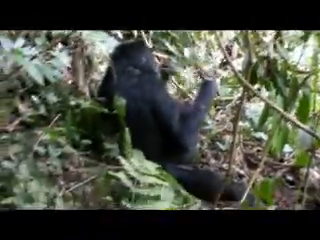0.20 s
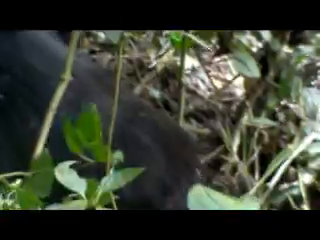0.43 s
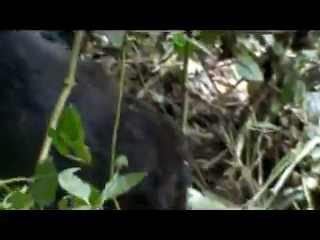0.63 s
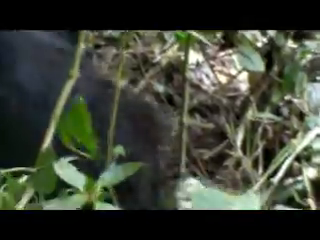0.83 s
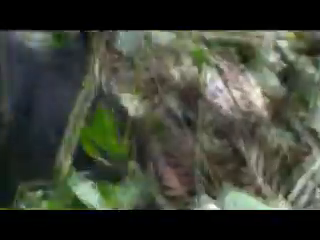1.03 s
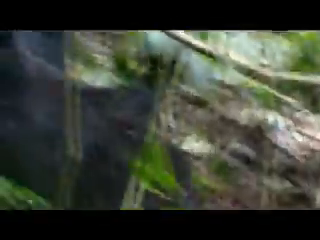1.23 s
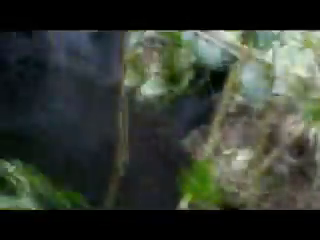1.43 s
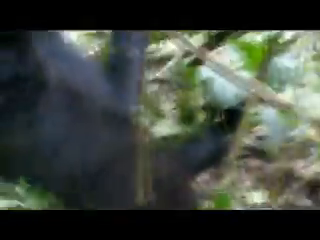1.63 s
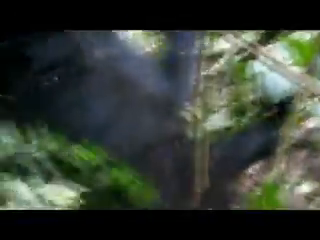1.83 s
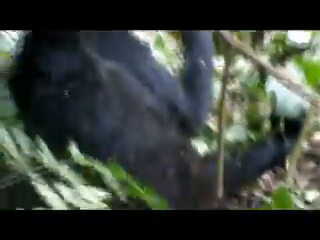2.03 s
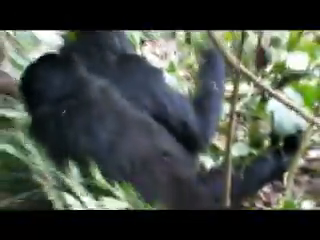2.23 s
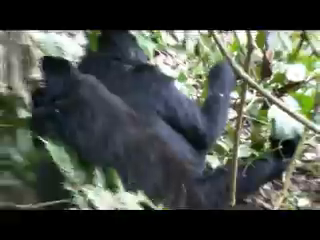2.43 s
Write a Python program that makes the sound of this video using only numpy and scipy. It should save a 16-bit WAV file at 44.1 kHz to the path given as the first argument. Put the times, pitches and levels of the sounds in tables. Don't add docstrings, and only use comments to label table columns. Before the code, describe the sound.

Dry twigs snap sharply and leaves rustle as heavy animals push through close forest undergrowth

```python
import sys
import numpy as np
from scipy import signal
from scipy.io import wavfile
from scipy.ndimage import uniform_filter1d

SR = 44100
rng = np.random.default_rng(int(sys.argv[2]) if len(sys.argv) > 2 else 0)


def store_wav(level_fs):
    pcm = np.round(np.clip(np.atleast_2d(level_fs), -1, 1) * 32767)
    wavfile.write(sys.argv[1], SR, pcm.T.astype(np.int16))


def volts_from_decibels(level):
    exponent = np.asarray(level, float) / 20
    return 10 ** exponent


N = 114660

# pitch_hz, level_db
HUSH_COLOUR = [(25, -40), (60, -7.5), (170, -3), (270, -16), (360, 0.5), (700, -6.5), (2600, -12.5),
               (7000, 2), (14000, -16.5)]
HUSH_DB, HUSH_FADE_DB_PER_S, HUSH_PATCHY_DB = -57, 2, 1.2
WATER_HZ, WATER_WIDTH_HZ, WATER_DB = 385, 41, -80

# pitch_hz, level_db
SINGERS = [(5025, -5.5), (5250, -1), (5325, -2), (5570, -1.5)]
# pitch_hz, level_db
EARLY_SINGERS = [(5075, -3), (5200, -9), (5360, -0.5), (5580, -7)]
THROB_HZ, WAVER_HZ, INSECT_DB = 37.97, 20.56, -56.5
FAR_INSECT_HZ, FAR_INSECT_WIDTH_HZ, FAR_INSECT_DB = 6700, 600, -65.0

# start_s, peak_db, pitch_hz
THUMPS = [(.212, -61, 50), (.413, -57, 62), (.418, -60, 160), (0.477, -53, 75), (.52, -60, 80),
          (.652, -52.5, 88), (.69, -56, 100), (.722, -60, 50), (1.051, -62, 70), (1.116, -58, 95),
          (1.472, -56, 51), (1.575, -59, 59.2), (1.6, -61, 60), (1.876, -63, 55)]
THUMP_T60_S = 0.048

# start_s, peak_db, pitch_hz, t60_s
KNOCKS = [(0.144, -50.5, 1530, 0.02), (0.2069, -49, 1325, 0.015), (0.4205, -42, 734, 0.036),
          (0.4706, -33, 2340, 0.031), (.485, -34.5, 2300, 0.018), (0.5126, -38.5, 2280, 0.035),
          (.533, -40.5, 2260, 0.043), (0.647, -41, 3500, 0.004), (.649, -40, 1300, .006),
          (.66, -41, 2720, .008), (0.6713, -40.5, 1440, 0.016), (.689, -39, 2110, .02),
          (.709, -48, 3600, .025), (.917, -50.5, 1170, 0.021), (1.0674, -39.5, 3420, 0.0077),
          (1.1265, -36, 1950, 0.005), (1.1265, -52, 790, 0.0038), (1.192, -48, 1162, 0.059),
          (1.2277, -43, 2040, 0.0054), (1.236, -47, 2970, .008), (1.259, -42, 3060, 0.0047),
          (1.311, -49, 1760, 0.013), (1.579, -48, 1430, 0.0057), (1.843, -51, 2200, 0.013),
          (1.8822, -40, 2300, .005), (1.8828, -35, 3860, 0.01)]
# pitch_ratio, level_db
OVERTONES = [(1.071, -4), (1.55, -4), (2.5, -2)]
CONTACT_S = 0.0048
LOW_KNOCK_PURER_DB = 17

# start_s, peak_db, dull_part_db (against the bright part), tail_t60_s, strongest_hz
SNAPS = [(.2072, -17, -13, .015, 10800), (.2155, -30, -22, .08, 13200), (.2218, -18, -18, .018, 8800),
         (.2274, -11, -14, 0.032, 11400), (0.2327, -15, -12, 0.027, 10100), (0.236, -32, -25, 0.034, 9500),
         (0.454, -28, -3.5, 0.077, 7000), (0.4704, -25, -0.5, .05, 5700), (.4855, -32, -10, 0.035, 5800),
         (0.491, -25, -14, .03, 8600), (0.5125, -26, -1, .07, 6300), (0.521, -27, -15, 0.043, 6500),
         (0.5346, -21.5, -12, 0.04, 9800), (0.541, -28, -12, .04, 8600), (.6475, -41, -3, .02, 6000),
         (.702, -42, -7, .015, 8000), (.7118, -36, -4, .02, 8000), (0.758, -30, -13, 0.076, 8000),
         (.8675, -24.5, -8, 0.01, 7940), (.9543, -30.5, 1, 0.032, 8450), (1.068, -29, -11, .046, 8560),
         (1.1265, -30, -14, 0.032, 9000), (1.2102, -18, -18, 0.022, 10800), (1.2477, -22, -20, .015, 11800),
         (1.2485, -28, -20, .015, 8000), (1.873, -38, -5, 0.013, 8000), (1.8814, -21, -6, 0.035, 7760),
         (1.8854, -21.5, -9, 0.097, 9250), (1.939, -27, -14, 0.033, 9500), (1.9498, -26, -22, 0.068, 9350),
         (1.9772, -27, -22, .04, 8600), (2.1217, -32, -7, 0.036, 8600), (2.134, -29, -8, .015, 9000),
         (2.143, -31, -11, 0.013, 9000), (2.158, -35, -4, .02, 8000), (2.262, -30, -6, 0.019, 9000),
         (2.287, -32, -12, .015, 9000), (2.41, -27, -17, 0.018, 10500)]
CRACK_HZ = [5420, 7140, 8600, 10190, 12500]
CRACK_T60_S, DULL_HZ, DULL_T60_S = 0.0031, 3777, 0.0046
CRACK_FALL_DB_PER_OCTAVE = 13
TEAR_S = .0007
TAIL_DB, SPLINTER_SPREAD_DB, SNAP_LOW_CUT_HZ = -11, 3.5, 1370

# start_s, vigour_db, coarse_share_db
EARLY_BRUSH = [
    (0, -58.5, 0),
    (.15, -54, -5),
    (.25, -41, -10),
    (.38, -48, -3.5),
]
# start_s, vigour_db, coarse_share_db (big leaves and stems)
BRUSH = [(.42, -47.5, -4), (.5, -40.5, -10.5), (.55, -44, -15), (.59, -51, 0.5), (.84, -51, -2.5),
         (1.0, -51.5, -2), (1.17, -51.5, -1), (1.3, -53, -5.5), (1.6, -52.5, -3), (1.83, -57, -5.5),
         (2.05, -52, -6.5), (2.13, -44, -9.5), (2.35, -49.5, -8.5), (2.6, -52, -4.5)]
# peak_s, vigour_db, coarse_share_db, length_s
SWEEPS = [
    (0.691, -46.5, 4, 0.08),
    (0.763, -49.5, -2.5, 0.077),
    (0.964, -50.5, -2, 0.087),
    (1.056, -43.5, -8.5, 0.067),
    (1.253, -50, 0, 0.12),
    (1.424, -59, 3, .02),
    (1.764, -50.5, -1, 0.046),
    (1.846, -51, -3, 0.06),
    (1.892, -45, -6.5, 0.092),
    (1.956, -43.5, -8, 0.11),
]
SWEEP_RISE = 0.62
# pitch_hz, level_db (per Hz)
FINE = [(2500, -26), (4000, -4), (6500, -1), (8500, -0.5), (10300, 1.5), (11500, 4.5), (12600, -7),
        (14000, 12.5)]
# pitch_hz, level_db (per Hz)
COARSE = [(250, -52), (400, -10.5), (700, -6), (1400, -4.5), (2300, 3.5), (3500, 4), (5000, -4),
          (7000, -4.5)]
GRAINS_PER_S, GRAIN_SPREAD_DB, LARGEST_GRAIN = 4000.0, 2, 4
GRAIN_CYCLES, CLUMP_DB = 6.8, 3.0
HISS_SHARE_DB, LEAF_PATCHY_DB, LEAF_LOW_CUT_HZ = 3, .8, 300

# time_s, gain_db
SCENE_CHANGE = [
    (0.376, 2),
    (.381, -15),
    (.398, -28.5),
    (.404, -15),
    (0.42, 0),
    (0.422, 2),
]
# pitch_hz, width_hz, depth (0 to 1)
MIC_DIPS = [(4780, 310, 0.19), (6100, 280, 0.35), (11060, 540, 0.3)]
# pitch_hz, width_hz, share_of_time (0 to 1)
DROPOUTS = [(2050, 160, .12), (2300, 160, .14), (2500, 170, .16), (2750, 170, .18), (2950, 170, .16),
            (3150, 180, .18), (3400, 180, .12), (3650, 180, .16), (3900, 200, .18), (4100, 200, .22),
            (4300, 220, .28), (4500, 220, .28), (4680, 200, .3), (4830, 200, .4), (6150, 200, .15)]
DROPOUT_RATE_HZ, TOP_HZ = 24, 13520


def rms_one(x):
    return x / np.sqrt(np.mean(x ** 2) + 1e-20)


def low_cut(x, hz):
    return signal.sosfilt(signal.butter(3, hz, "high", fs=SR, output="sos"), x)


def drift(rate):
    r = np.exp(-2 * np.pi * rate / SR)
    wander = signal.lfilter([1], [1, -2 * r, r * r], rng.standard_normal(N + SR))
    return rms_one(wander[SR:])


def ring(clicks, hz, t60):
    r = volts_from_decibels(-60 / (t60 * SR))
    w = 2 * np.pi * hz / SR
    return signal.lfilter([0, np.sin(w)], [1, -2 * r * np.cos(w), r * r], clicks + 1e-18)


def band_t60(width_hz):
    return np.log(1000) / np.pi / width_hz


def at_hz(points, hz):
    f, db = np.transpose(points)
    return np.interp(np.log(hz), np.log(f), db)


def hiss(spectrum, patchy_db):
    edges = 22 * 2 ** np.arange(0, 9.5, 1 / 3)
    out = 0
    together = drift(14)
    white = rng.standard_normal((2, N))
    for k, (low, high) in enumerate(zip(edges, edges[1:])):
        band_filter = signal.butter(2, [low, high], "band", fs=SR, output="sos")
        band = signal.sosfilt(band_filter, white[k % 2])
        flicker = together * min(low / 1500, 1) + 0.74 * drift(4.2)
        out = out + band * volts_from_decibels(at_hz(spectrum, np.sqrt(low * high)) + patchy_db * flicker)
    return rms_one(out)


def grains(spectrum, rate):
    size_db = GRAIN_SPREAD_DB * np.minimum(rng.exponential(1, N), LARGEST_GRAIN)
    sizes = volts_from_decibels(size_db) * rng.choice([-1, 1], N)
    born = rng.random(N) < rate * volts_from_decibels(CLUMP_DB * drift(25)) / SR
    pitches = np.geomspace(spectrum[0][0], spectrum[-1][0], 20)
    dealt = rng.integers(0, 20, N)
    out = 0
    for k, hz in enumerate(pitches):
        clicks = sizes * born * (dealt == k)
        out = out + volts_from_decibels(at_hz(spectrum, hz)) * hz * ring(clicks, hz, GRAIN_CYCLES / hz)
    return rms_one(out)


def add(out, s, sound):
    i = int(s * SR)
    out[i:i + len(sound)] += sound[:len(out) - i]


def distant_water():
    drone = ring(rng.standard_normal(N), WATER_HZ, band_t60(WATER_WIDTH_HZ))
    return volts_from_decibels(WATER_DB) * rms_one(low_cut(drone, 280))


def forest_hush():
    from_middle_s = (np.arange(N) - N / 2) / SR
    return volts_from_decibels(HUSH_DB - HUSH_FADE_DB_PER_S * from_middle_s) * hiss(HUSH_COLOUR, HUSH_PATCHY_DB)


def insects():
    turn, near = 2 * np.pi / SR, 0
    beat = turn * np.cumsum(THROB_HZ + 9.49 * drift(6.45))
    early = np.arange(N) < SCENE_CHANGE[2][0] * SR
    for (hz_after, db_after), (hz_before, db_before) in zip(SINGERS, EARLY_SINGERS):
        hz = np.where(early, hz_before, hz_after)
        db = np.where(early, db_before, db_after)
        throb = np.clip(.7 + .42 * np.sin(beat + 1.3 * drift(6)), .15, 1)
        throb = throb * volts_from_decibels(2 * drift(16))
        near = near + volts_from_decibels(db) * throb * np.sin(turn * np.cumsum(hz + WAVER_HZ * drift(28.0)))
    far = ring(rng.standard_normal(N), FAR_INSECT_HZ, band_t60(FAR_INSECT_WIDTH_HZ))
    return volts_from_decibels(INSECT_DB) * rms_one(near) + volts_from_decibels(FAR_INSECT_DB) * rms_one(low_cut(far, 5700))


def thumps():
    out, t = np.zeros(N), np.arange(SR // 4) / SR
    for s, db, hz in THUMPS:
        force = signal.lfilter([1], [1, -.97], rng.standard_normal(len(t)))
        force = force * volts_from_decibels(-20 * t / 0.015) * np.minimum(t / 0.0034, 1)
        body = ring(force, hz, THUMP_T60_S)
        body = body + volts_from_decibels(-1.0) * ring(force, 2.27 * hz, 0.6 * THUMP_T60_S)
        add(out, s, volts_from_decibels(db - 1.0) * body / np.abs(body).max())
    return low_cut(out, 59)


def knocks():
    out, t = np.zeros(N), np.arange(SR // 8) / SR
    for s, db, hz, t60 in KNOCKS:
        force = rng.standard_normal((4, len(t))) * volts_from_decibels(-20 * t / CONTACT_S)
        purer_db = LOW_KNOCK_PURER_DB * min(np.log2(hz / 2000), 0)
        for k, (ratio, below_db) in enumerate([(1, 0)] + list(OVERTONES)):
            mode = ring(force[k], hz * ratio, t60 / ratio)
            level_db = db + below_db + (ratio > 1) * purer_db
            add(out, s, volts_from_decibels(level_db) * mode / np.abs(mode).max())
    return low_cut(out, 560)


def snaps():
    out, t = np.zeros(N), np.arange(SR // 8) / SR
    for s, db, dull_db, tail_s, strongest_hz in SNAPS:
        noise, luck = rng.standard_normal((2, len(t))), rng.normal(0, 1, 6)
        splinters = noise[0] * volts_from_decibels(SPLINTER_SPREAD_DB * np.abs(noise[1]) - 9.0)
        force = volts_from_decibels(TAIL_DB - 60 * t / max(tail_s, .005)) * splinters * np.minimum(t / TEAR_S, 1)
        force[int(TEAR_S * SR)] += 1
        bright = 0
        for k, hz in enumerate(CRACK_HZ):
            octaves_away = abs(np.log2(hz / strongest_hz))
            level = volts_from_decibels(0.49 * luck[k] - CRACK_FALL_DB_PER_OCTAVE * octaves_away)
            bright = bright + (-1) ** k * level * ring(force, hz, CRACK_T60_S)
        dull = volts_from_decibels(dull_db) * ring(force, DULL_HZ * (1 + luck[5] / 25), DULL_T60_S)
        add(out, s, volts_from_decibels(db - 6.0) * (bright + dull))
    return low_cut(out, SNAP_LOW_CUT_HZ)


def leaves():
    s, vigour_db, coarse_db = np.transpose(list(EARLY_BRUSH) + list(BRUSH))
    t = np.arange(N) / SR
    vigour_db, coarse_db = np.interp(t, s, vigour_db), np.interp(t, s, coarse_db)
    fine_power, coarse_power = volts_from_decibels(2 * vigour_db), volts_from_decibels(2 * (vigour_db + coarse_db))
    for peak_s, db, share_db, length_s in SWEEPS:
        side_s = length_s * np.where(t < peak_s, SWEEP_RISE, 1)
        power = volts_from_decibels(2 * db) * np.exp(-(2 * (t - peak_s) / side_s) ** 2)
        fine_power = fine_power + power
        coarse_power = coarse_power + power * volts_from_decibels(2 * share_db)
    fine = grains(FINE, GRAINS_PER_S) + volts_from_decibels(HISS_SHARE_DB) * hiss(FINE, LEAF_PATCHY_DB)
    coarse = grains(COARSE, .3 * GRAINS_PER_S) + volts_from_decibels(HISS_SHARE_DB) * hiss(COARSE, LEAF_PATCHY_DB)
    foliage = volts_from_decibels(-5.5) * (np.sqrt(fine_power) * fine + np.sqrt(coarse_power) * coarse)
    return low_cut(foliage, LEAF_LOW_CUT_HZ)


def scene():
    background = forest_hush() + distant_water() + insects()
    animals = thumps() + knocks() + snaps() + leaves()
    return (background + animals)[None]


def shape_spectrum(x):
    for hz, width_hz, depth in MIC_DIPS:
        peak = signal.lfilter(*signal.iirpeak(hz, hz / width_hz, fs=SR), x)
        x = x - np.clip(depth, 0, 1) * peak
    quietness = -np.log(uniform_filter1d(x ** 2, size=1000) + 1e-12) / 4
    for hz, width_hz, share in DROPOUTS:
        chance = drift(DROPOUT_RATE_HZ) + quietness
        lost = uniform_filter1d(1. * (chance > np.quantile(chance, 1 - share)), size=300)
        band = signal.butter(2, [hz - width_hz / 2, hz + width_hz / 2], "band", fs=SR, output="sos")
        x = x - lost * signal.sosfiltfilt(band, x)
    return signal.sosfilt(signal.ellip(10, .5, 62, TOP_HZ, fs=SR, output="sos"), x)


def top_cut(x):
    return signal.sosfilt(signal.butter(12, 14740, fs=SR, output="sos"), x)


def record(dry):
    s, db = np.transpose(SCENE_CHANGE)
    gain = volts_from_decibels(np.interp(np.arange(N) / SR, s, db))
    return top_cut(shape_spectrum(dry) * gain)


dry = scene()
out = record(dry)
store_wav(out)
```